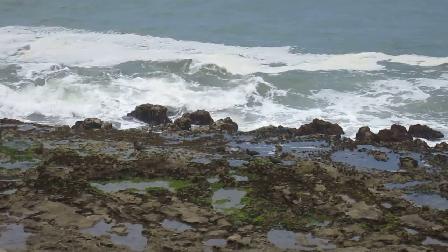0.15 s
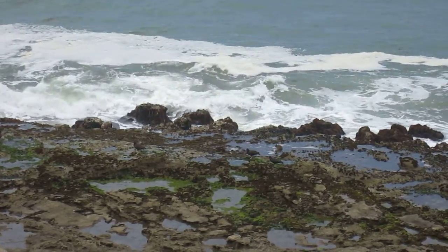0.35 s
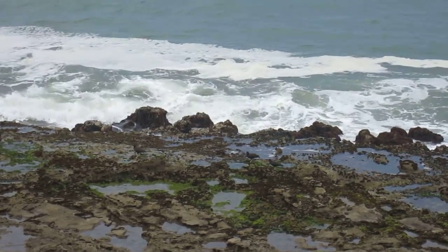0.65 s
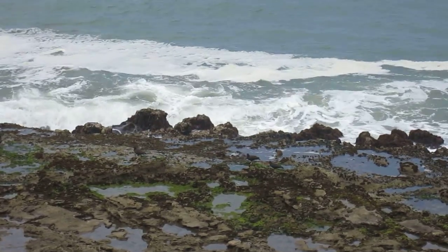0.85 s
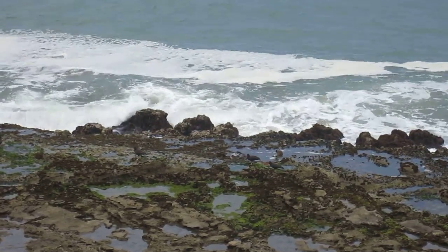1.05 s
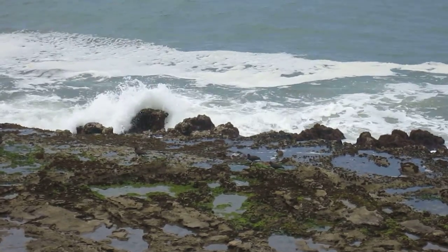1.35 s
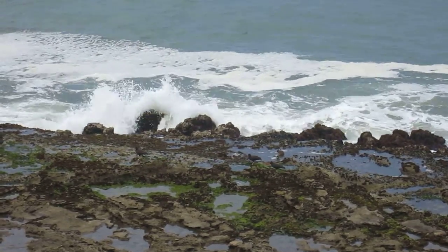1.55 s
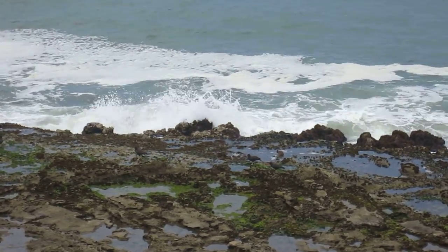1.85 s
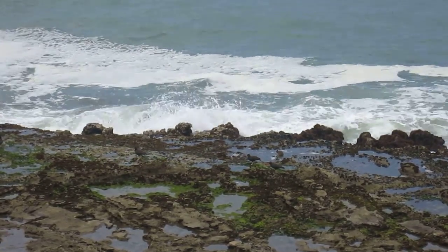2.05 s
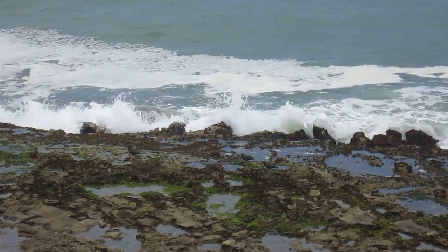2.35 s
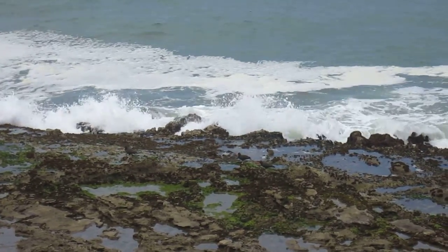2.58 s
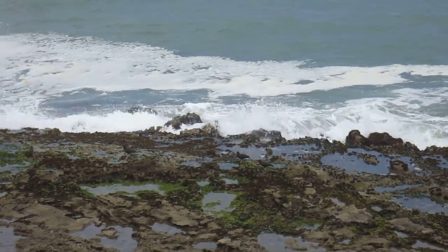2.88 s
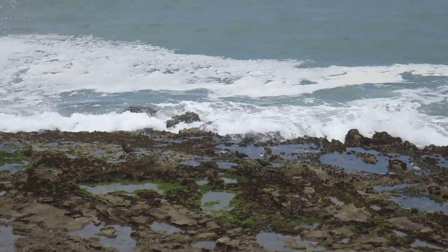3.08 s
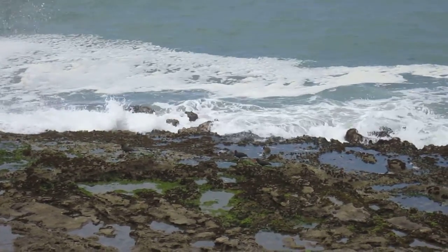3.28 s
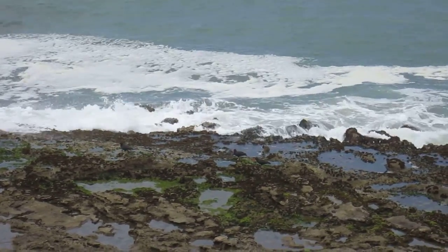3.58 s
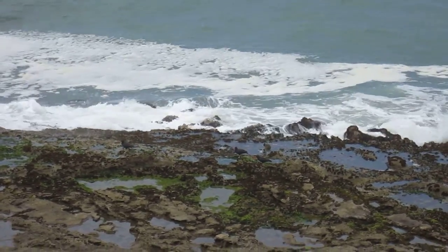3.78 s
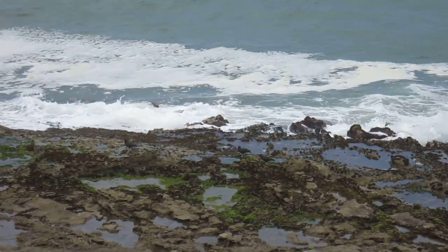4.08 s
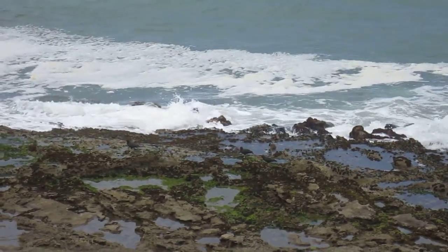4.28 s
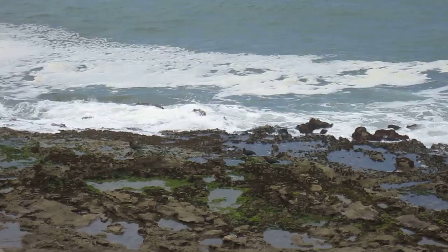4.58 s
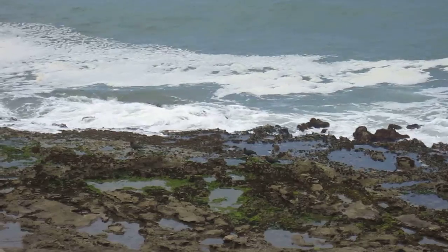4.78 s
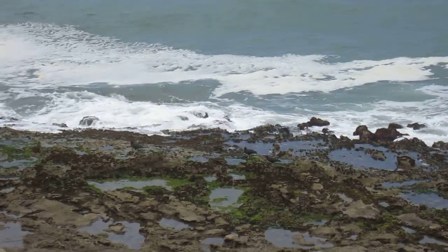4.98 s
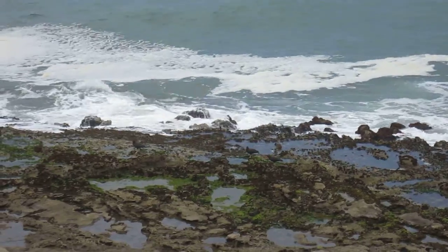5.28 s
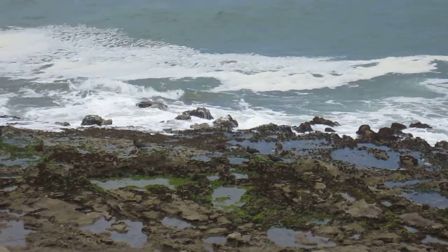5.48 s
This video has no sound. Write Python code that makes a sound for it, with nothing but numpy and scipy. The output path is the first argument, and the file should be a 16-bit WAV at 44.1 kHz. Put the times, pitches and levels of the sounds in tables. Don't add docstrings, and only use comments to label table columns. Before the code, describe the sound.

Wind thumps the bare microphone immediately after a first tiny piped whistle. After a short gap the bird calls on at a steady pace of about two a second, each pipe thin, high and very short, with a slight hitch and quick drop. Broad, soft wave noise runs beneath, fuller from about three seconds. Low rumbling gusts come and go, and a second, distant bird chirps faintly twice. Outdoor, dry, with only slight rock reflections.

```python
import sys
import numpy as np
from scipy import signal
from scipy.io import wavfile
from scipy.ndimage import uniform_filter1d

SR = 44100
rng = np.random.default_rng(int(sys.argv[2]) if len(sys.argv) > 2 else 0)


def master(y):
    cut = np.clip(np.atleast_2d(y).T, -1, 1)
    pcm = np.round(cut * 32767)
    wavfile.write(sys.argv[1], SR, pcm.astype(np.int16))


def volts_from_db(level):
    exponent = np.asarray(level, float) / 20
    return 10 ** exponent


N = 248283

# (time [s], body level [dB], spray against body [dB])
SURF_SWELL = [(0.0, -40.5, -10.5), (0.14, -45, -13), (0.4, -44.5, -12.5), (0.74, -42.5, -12),
              (1.08, -42.5, -12.5), (1.25, -47.5, -11), (1.52, -44.5, -16.5), (1.72, -42, -12.5),
              (2.13, -43, -11.5), (2.79, -37, -11.5), (3.3, -37.5, -10), (3.57, -38, -10.5),
              (3.93, -40.5, -14), (4.14, -39.5, -15.5), (4.58, -38, -13), (4.85, -37.5, -15.5),
              (5.2, -39.5, -18.5), (5.63, -42.5, -16.5)]
# (frequency [Hz], density [dB per Hz])
SURF_BODY = [(60, -25), (200, 9.5), (350, 3), (450, 1), (610, 3.5), (720, -5.5), (1000, -2), (1600, -6),
             (2100, -7), (2350, -9), (4000, -11), (7000, -25)]
SURF_SPRAY = [(1500, -20), (3000, -5), (5200, 1.5), (7700, -3.5), (10000, -11.5), (12000, -22.5),
              (15000, -42)]
SURF_SPARKLE = [(8000, -10), (10500, -1), (12000, -3.5), (14000, -8), (15600, -12)]
# (time [s], length [s], rumble level [dB], flutter level [dB])
GUSTS = [(0.026, 0.031, -10, -18.5), (0.167, 0.025, -12.5, -20.5), (0.384, 0.24, -24, -27),
         (0.554, 0.037, -23.5, -24.5), (0.805, 0.052, -20, -26.5), (.91, 0.02, -13, -38),
         (1.058, 0.064, -20, -26.5), (1.167, 0.045, -16.5, -18), (1.247, 0.032, -21.5, -23.5),
         (1.389, 0.042, -23, -18), (1.512, 0.074, -41, -20), (1.885, 0.062, -18.5, -24),
         (1.94, 0.062, -26.5, -22.5), (2.051, 0.056, -23.5, -19.5), (2.384, 0.45, -26.5, -30),
         (2.696, 0.1, -21.5, -20), (2.945, 0.19, -20, -22.5), (3.157, .2, -24.5, -35),
         (3.496, 0.28, -21, -26), (3.674, 0.034, -14, -18.5), (3.81, 0.11, -23.5, -26.5),
         (3.978, 0.065, -16.5, -24), (4.133, 0.049, -22, -17.5), (4.179, 0.02, -18, -35),
         (4.25, .12, -40, -24), (4.398, 0.39, -30.5, -31), (4.795, .15, -26, -28),
         (4.98, 0.05, -10.5, -20.5), (5.072, .1, -42, -23), (5.265, 0.019, -11, -23)]
LATE_BREEZE = (5.5, 0.22, -27, -23.5)
# (rumble level [dB], flutter level [dB])
LULL_DB = (-31, -30)
# (frequency [Hz], density [dB per Hz])
WIND_RUMBLE = [(8, 4.5), (22, -1.5), (50, -1.5), (85, -5.5), (130, -16.5), (300, -49)]
WIND_FLUTTER = [(50, -30), (95, 2.5), (140, -2.5), (200, -10), (320, -18.5), (600, -35.5), (1200, -54)]
WIND_ROAR = [(150, -31), (300, -9), (500, -18.5), (900, -17), (1600, -36), (2500, -58)]
# (time [s], peak level [dB], centre frequency [Hz])
EDDY_POPS = [(0.0271, -27, 200), (.034, -14, 167), (1.179, -11.5, 89.5), (1.1856, -15, 380),
             (1.1895, -9.5, 483), (1.189, -9, 397), (1.3793, -16, 426), (1.3822, -14, 423),
             (1.3847, -10, 254), (1.39, -17, 452), (1.393, -21.5, 400), (1.507, -23, 250),
             (1.875, -19.5, 302), (1.933, -20, 300), (2.666, -18, 605), (2.671, -20, 545),
             (3.969, -19.5, 233), (4.13, -16, 259), (4.958, -19, 220), (5.258, -20, 148),
             (5.263, -15.5, 220), (5.334, -22, 190), (5.4253, -15, 640), (5.427, -12.5, 420)]
# (time [s], length [s], start pitch [Hz], end pitch [Hz], level [dB])
FAR_CALLS = [
    (1.83, 0.011, 1860, 2100, -40),
    (4.88, 0.019, 2430, 2540, -36.5),
]
# (delay [s], level [dB])
ROCK_ECHOES = [
    (.009, -23),
    (0.011, -15.5),
    (0.022, -22),
    (.029, -18),
    (0.039, -23),
]
# (held note starts [s], held length [s], hitch after start [s], scoop length [s])
WHISTLES = [(.014, .043, .0205, .016), (.682, .042, .0185, .021), (1.191, .052, .0225, .016),
            (1.687, .049, .0325, .018), (2.183, .052, .0285, .016), (2.668, .055, .0315, .013),
            (3.135, .057, .0295, .012), (3.668, .053, .0345, .013), (4.106, .057, .0295, .015),
            (4.685, .054, .0340, .014), (5.181, .055, .0325, .013)]
# (pitch [Hz], level [dB])
HELD_NOTES = [(3010, -30), (3060, -31), (2964, -29.5), (2974, -22.5), (2985, -26), (2959, -20.5),
              (2985, -25), (2973, -26), (2990, -25.5), (2956, -21), (2970, -25)]
# (scoop level [dB], arch depth [share], hitch height [Hz],
#          level after hitch against held [dB], third partial level [dB])
MANNERS = [(-36, 0.68, 13, -5, -45), (-34, 1, 150, 0, -48.5), (-32.5, 1.12, 99, -3, -46.5),
           (-30, .8, 22, -5, -48), (-32, 1.09, 53, -2.5, -45.5), (-28, 1.05, 85, -5.5, -48),
           (-29.5, 1.06, 170, -3, -48), (-29, 1.22, 70, -5, -47.5), (-32, 0.98, 120, -5, -50),
           (-30.5, 1.2, 64, -5.5, -42), (-33, 1.11, 123, -3, -46.5)]
# (level before swell against held [dB], top partials [dB], octave [dB], scoop octave level [dB])
COLOURS = [(-2, -7, 0.1, -35), (-2, -6, -2.1, -36.5), (-4, 2.5, 1, -35), (-3.5, 2.1, 0.6, -36),
           (-4, 3, -0.3, -36), (-5, 5, -2.5, -37), (-3.5, -1.1, 1.5, -37), (-3, 2.1, 2, -35),
           (-5, 0.1, -1.5, -37), (-5, -2.1, 0.3, -31), (-3.5, -1.1, 0.5, -35)]
# (start [Hz], middle [Hz], end [Hz])
SCOOP_HZ = (1736, 2033, 2220)
# (start [dB], middle [dB], end [dB])
SCOOP_PARTIALS = [(-16, -1.5, 0), (0, -5, -25), (-30, -15, -18), (-17, -23, -30)]
# (start [Hz], middle [Hz], end [Hz])
DROP_HZ = (2720, 2330, 2060)
# (start [dB], middle [dB], end [dB])
DROP_PARTIALS = [(5.5, -6.5, 9.5), (-8, -21, -30)]
# jump, settled, middle, before hitch, hitch, after hitch,
# recovered, letting go, end. Pitch bend [Hz], then partial levels [dB]
BEND_HZ = (-165, -41, -4, 3, 5, -13, -43, -115, -250)
NOTE_DB = (-1.5, 1.5, 1.2, -0.8, -2.5, -1.5, 3.5, -5, -4)
OCTAVE_DB = (-41, -38.5, -39, -43, -36.5, -42, -37, -38, -47)
THIRD_DB = (0, 1.5, -2, -1, -1, -4, -0.5, 2.1, 0)

SETTLE_S, HITCH_UP_S, HITCH_DOWN_S, LET_GO_S = 0.007, 0.0025, 0.005, 0.006
OVERLAP_S = 0.0015


def evened(x):
    return x / np.sqrt(np.mean(x ** 2) + 1e-20)


def add(mix, s, sound):
    part = mix[max(round(s * SR), 0):][:len(sound)]
    part += sound[:len(part)]


def along(table, column):
    rows = np.array(table)
    return np.interp(np.arange(N) / SR, rows[:, 0], rows[:, column])


def noise(colour, size, patchy_db, patch_hz, patch_s, flicker_db):
    hop = size // 4
    hz = np.fft.rfftfreq(size, 1 / SR)
    frames = N // hop + 5
    real, imaginary, patches = rng.standard_normal((frames, len(hz), 3)).T
    patches = uniform_filter1d(patches, max(int(patch_hz * size / SR), 1), axis=0)
    patches = evened(uniform_filter1d(patches, max(int(patch_s * SR / hop), 1), axis=1))
    colour_hz, colour_db = np.transpose(colour)
    tilt_db = np.interp(np.log(hz + 1), np.log(colour_hz), colour_db, left=-150, right=-150)[:, None]
    flicker = flicker_db * rng.standard_normal(frames)
    spectra = (real + 1j * imaginary) * volts_from_db(tilt_db + patchy_db * patches + flicker)
    return evened(signal.istft(spectra, nperseg=size, noverlap=size - hop)[1][:N])


def surf():
    body = noise(SURF_BODY, size=512, patchy_db=1.0, patch_hz=500, patch_s=0.074, flicker_db=0.7)
    spray = noise(SURF_SPRAY, size=512, patchy_db=1.4, patch_hz=1500, patch_s=0.11, flicker_db=0.94)
    sparkle = noise(SURF_SPARKLE, size=512, patchy_db=2.5, patch_hz=2500, patch_s=0.04, flicker_db=1.0)
    body_db = along(SURF_SWELL, column=1)
    spray_db = body_db + along(SURF_SWELL, column=2)
    over_db = spray_db + 53
    sparkle_db = -71.5 + np.maximum(1.6 * over_db, 0.66 * over_db)
    return volts_from_db(body_db + 6.0) * body + volts_from_db(spray_db + 6.5) * spray + volts_from_db(sparkle_db + 7.5) * sparkle


def gusting():
    t = np.arange(0, N / SR + 0.002, 0.001)
    s, length_s, *peaks_db = np.transpose([*GUSTS, LATE_BREEZE])
    bells = np.exp(-(2 * (t[:, None] - s) / length_s) ** 2 / 2)
    levels_db = []
    for lull_db, peak_db in zip(LULL_DB, peaks_db):
        level = np.sqrt(volts_from_db(lull_db) ** 2 + bells ** 2 @ volts_from_db(peak_db) ** 2)
        levels_db.append(np.interp(np.arange(N) / SR, t, 20 * np.log10(level)))
    return levels_db


def steadied(x, span_s, share):
    power = abs(uniform_filter1d(x ** 2, round(span_s * SR)))
    return evened(x / (power + 0.05) ** (share / 2))


def eddy_pop(hz):
    u = 2 * np.pi * hz * np.arange(-0.015, 0.015, 1 / SR)
    rounded = 1.65 * u * np.exp(-u ** 2 / 2)
    edge = 1.1 * u * np.exp(-2.2 * abs(u))
    return -(rounded + edge)


def wind():
    rumble = noise(WIND_RUMBLE, size=4096, patchy_db=1.4, patch_hz=40, patch_s=0.05, flicker_db=2.0)
    flutter = noise(WIND_FLUTTER, size=1024, patchy_db=3.0, patch_hz=200, patch_s=0.015, flicker_db=1.0)
    roar = noise(WIND_ROAR, size=256, patchy_db=1.5, patch_hz=800, patch_s=0.006, flicker_db=3.0)
    rumble_db, flutter_db = gusting()
    out = volts_from_db(rumble_db + 0.6) * steadied(rumble, span_s=0.096, share=0.29)
    out += volts_from_db(flutter_db + 0.17) * steadied(flutter, span_s=0.1, share=0.27)
    out += volts_from_db(0.4 * (flutter_db + 18.0) - 39.5) * roar
    for s, peak_db, hz in EDDY_POPS:
        add(out, s - 0.015, volts_from_db(peak_db) * eddy_pop(hz))
    return out


def tone(hz, partial_db):
    turns = 2 * np.pi * np.cumsum(hz) / SR
    air = uniform_filter1d(rng.standard_normal((5, 4000)), size=130, axis=1)
    air = evened(uniform_filter1d(air, size=130, axis=1))[:, :len(hz)]
    x = np.zeros(len(hz))
    for k, db in enumerate(partial_db, start=1):
        shimmer_db = 1.1 * (k - 0.5) * air[k - 1]
        x += volts_from_db(db + shimmer_db) * np.sin(k * turns)
    soft_ends = signal.windows.tukey(len(hz), min(0.0045 * SR / len(hz), 1))
    return np.sqrt(2) * x * soft_ends


def glide(length_s, hz, partial_db):
    u = np.linspace(0, 1, round(length_s * SR))
    pitch, *levels = (np.interp(u, np.linspace(0, 1, len(v)), v) for v in [hz, *partial_db])
    return tone(pitch, levels)


def distant_bird():
    out = np.zeros(N)
    for s, length_s, from_hz, to_hz, db in FAR_CALLS:
        add(out, s, glide(length_s, (from_hz, to_hz), [(db, db)]))
    return out


def rock_reflections(x):
    taps = np.zeros(SR // 20)
    for delay_s, db in ROCK_ECHOES:
        taps[round(delay_s * SR)] = volts_from_db(db)
    return signal.lfilter(*signal.butter(2, 5000, fs=SR), signal.oaconvolve(x, taps)[:N])


def held_note(length_s, hitch_s, hz, db, arch, hitch_hz, late_db, third_db, early_db, edge_db, reedy_db):
    after_s, go_s = hitch_s + HITCH_DOWN_S, length_s - LET_GO_S
    moments = [0, SETTLE_S, (SETTLE_S + hitch_s) / 2, hitch_s - HITCH_UP_S, hitch_s,
               after_s, (after_s + go_s) / 2, go_s, length_s]
    moments = np.maximum.accumulate(moments)
    t = np.arange(-0.001, length_s + 0.002, 1 / SR)
    step = np.arange(9)
    hitch, late, early = step == 4, step >= 4, step < 2
    pitch = np.interp(t, moments, hz + arch * np.array(BEND_HZ) + hitch_hz * hitch)
    note_db = np.interp(t, moments, db + np.array(NOTE_DB) + late_db * late + early_db * early)
    effort_db = 0.65 * (db + 25)
    octave_db = np.interp(t, moments, effort_db + reedy_db + np.array(OCTAVE_DB))
    upper_db = np.interp(t, moments, third_db + np.array(THIRD_DB))
    thinning_db = 3.9 * np.linspace(-1, 1, len(t)) ** 6
    bright_db = uniform_filter1d(upper_db, size=300) - thinning_db + edge_db
    return tone(pitch, [note_db, octave_db, upper_db, bright_db - 10.5, bright_db - 30])


def shorebird():
    out = np.zeros(N)
    for timing, (hz, db), (scoop_db, *manner), (*colour, scoop_octave_db) in zip(
            WHISTLES, HELD_NOTES, MANNERS, COLOURS):
        s, length_s, hitch_s, scoop_s = timing
        add(out, s - 0.001, held_note(length_s, hitch_s, hz, db, *manner, *colour))
        scoop_base = np.array([[scoop_db], [scoop_octave_db], [scoop_db], [scoop_db]])
        scoop = glide(scoop_s, SCOOP_HZ, scoop_base + np.array(SCOOP_PARTIALS))
        add(out, s - scoop_s + OVERLAP_S, scoop)
        drop = glide(0.0088, DROP_HZ, -34.5 + np.array(DROP_PARTIALS))
        add(out, s + length_s - OVERLAP_S, drop)
    return out


def scene():
    background = surf() + wind()
    calls = distant_bird() + shorebird()
    return (background + calls + rock_reflections(calls))[None]


def top_cut(x):
    return signal.sosfilt(signal.butter(12, 15740, fs=SR, output="sos"), x)


def record(dry):
    lowpass = signal.firwin(511, 15890, window=("kaiser", 9), fs=SR)
    limited = signal.oaconvolve(dry, lowpass[None], "same")
    return top_cut(limited)


dry = scene()
out = record(dry)
master(out)
```